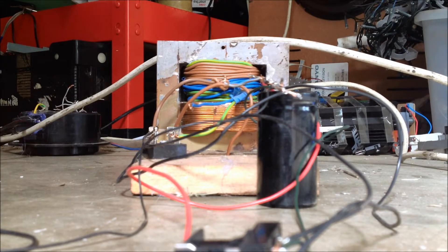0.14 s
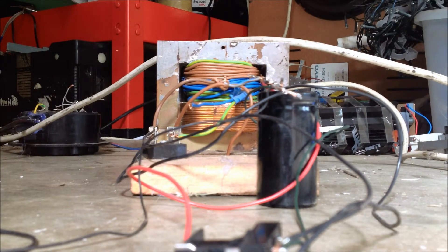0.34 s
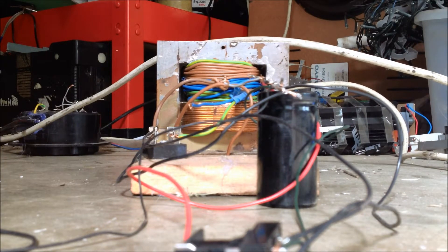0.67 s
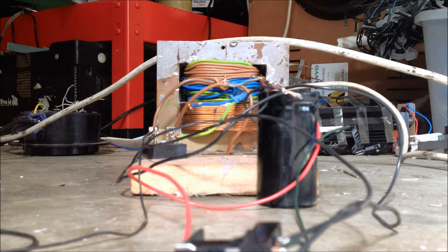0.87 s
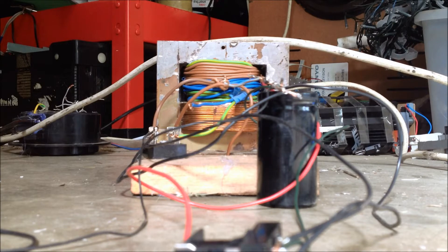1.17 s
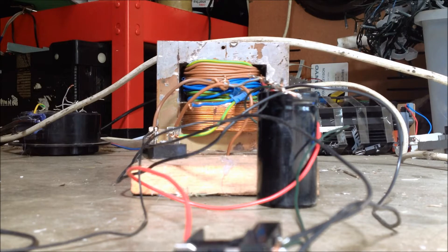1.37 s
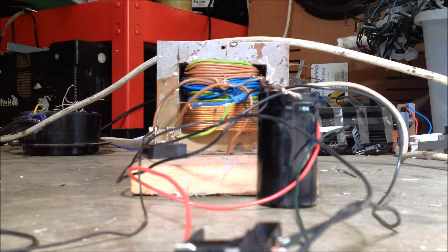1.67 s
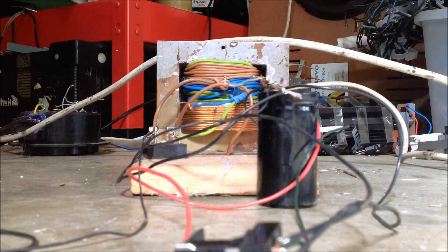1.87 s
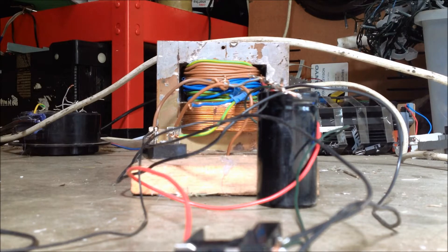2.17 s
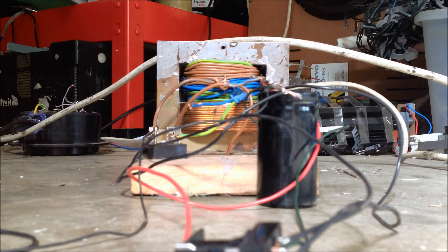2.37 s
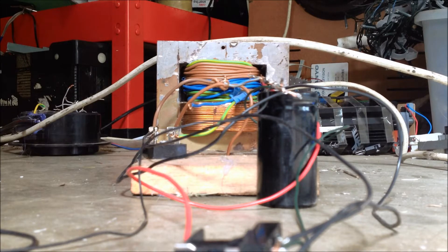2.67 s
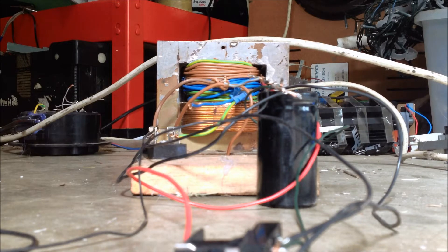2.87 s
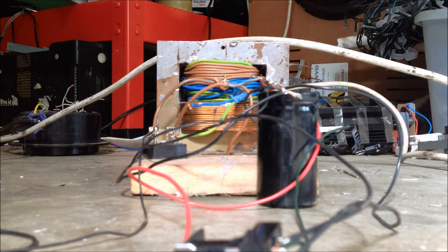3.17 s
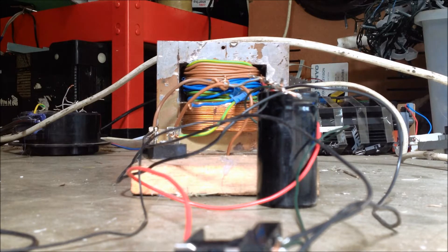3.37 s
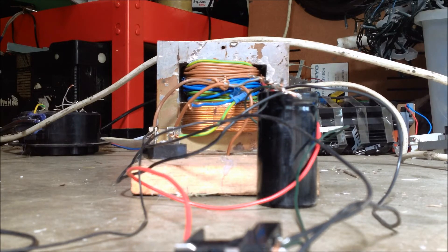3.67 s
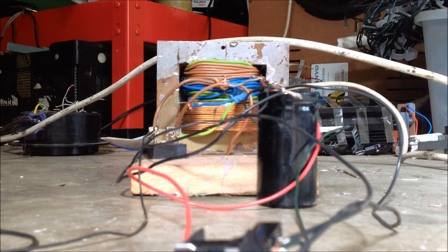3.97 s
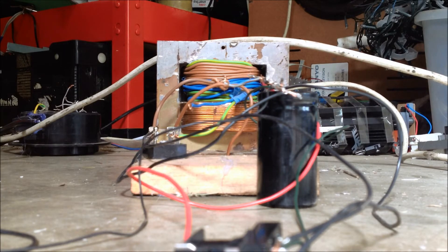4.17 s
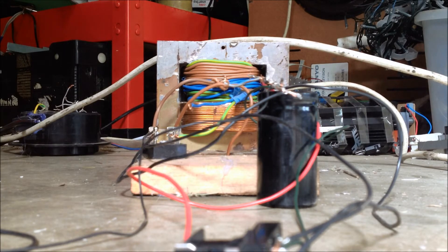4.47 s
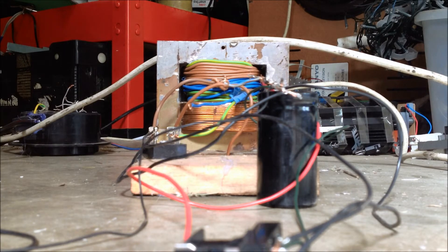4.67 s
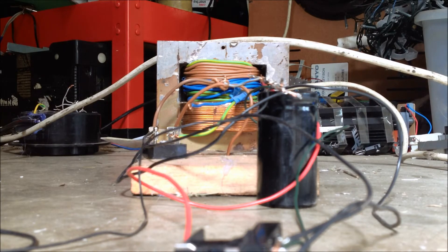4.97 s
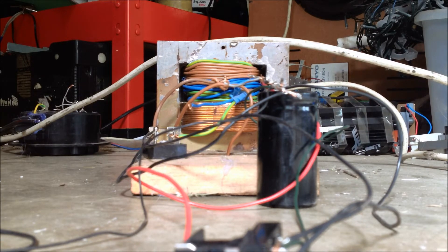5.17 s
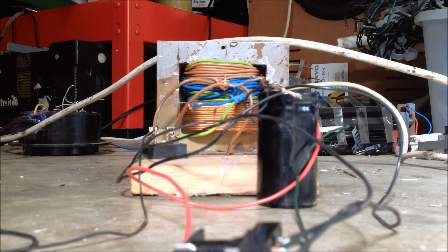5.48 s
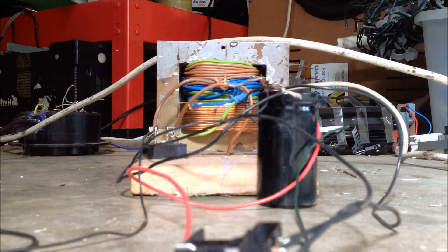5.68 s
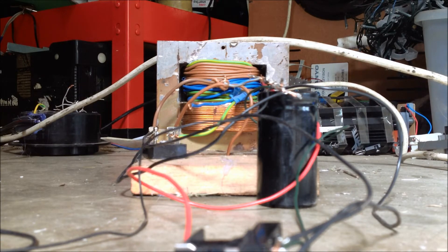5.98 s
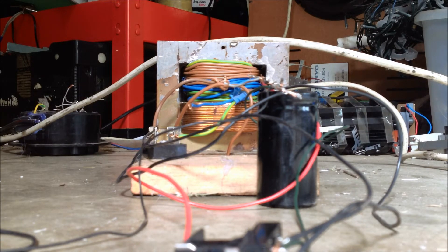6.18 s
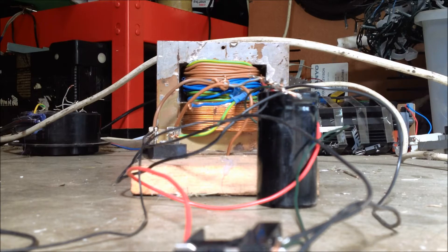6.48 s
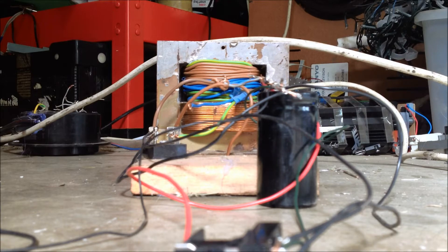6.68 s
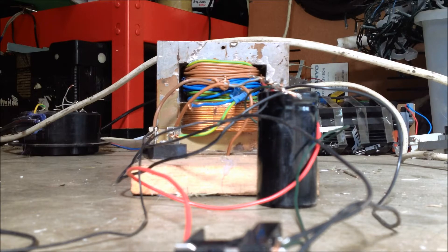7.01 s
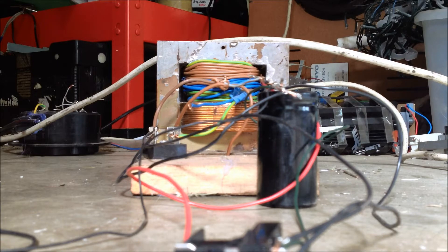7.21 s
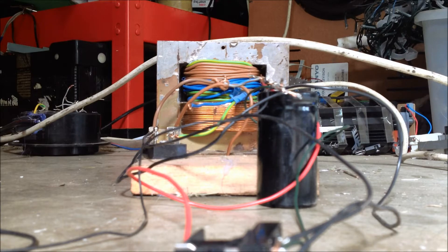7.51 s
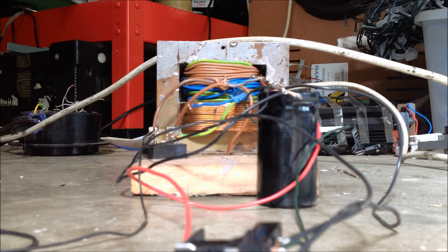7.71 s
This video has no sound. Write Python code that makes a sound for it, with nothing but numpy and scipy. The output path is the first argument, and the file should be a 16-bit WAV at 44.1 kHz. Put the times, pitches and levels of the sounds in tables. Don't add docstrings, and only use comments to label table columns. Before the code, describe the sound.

Six short bursts of loud, sharp electric sparks snap in a hard workshop, faint switch ticks before each, over quiet hum and hiss.

```python
import sys
import numpy as np
from scipy import signal
from scipy.fft import rfft, irfft
from scipy.io import wavfile
from scipy.ndimage import uniform_filter1d

SR = 44100
rng = np.random.default_rng(int(sys.argv[2]) if len(sys.argv) > 2 else 0)


def file_out(sig):
    cols = np.atleast_2d(sig).T
    lim = np.clip(cols, -1, 1)
    pcm = np.round(lim * 32767).astype(np.int16)
    wavfile.write(sys.argv[1], SR, pcm)


def rack_gain(trim_db):
    fader = np.asarray(trim_db, float)
    return 10 ** (fader / 20)


N = 346185

ARC_DULLING, ARC_SPREAD_DB = (0.042, 0.33, 0.93, 0), 3


def rms_one(x):
    return x / np.sqrt(np.mean(x ** 2) + 1e-20)


def band(x, low_hz, high_hz, order=2):
    high_hz = min(high_hz, 0.45 * SR)
    sos = signal.butter(order, [low_hz, high_hz], "band", fs=SR, output="sos")
    return signal.sosfilt(sos, x + 1e-18) * np.sqrt(SR / 2 / (high_hz - low_hz))


def coloured_rows(s, db, shift_db, extra_db, fade_ms, colour, follows, spread_db):
    chance_db = spread_db * rng.standard_normal((len(s), 4))
    levels_db = np.add.outer(db, colour) + np.outer(shift_db, follows) + chance_db
    levels_db[:, 3] += extra_db
    return np.column_stack([s, levels_db, fade_ms])


def discharges(rows, voices, rise_ms, after_db, after_ms, crackle_db, click_db):
    thump_hz = (130, 1107.5)
    lead = round(0.002 * SR)
    t_ms = (np.arange(round(0.05 * SR)) - lead) / SR * 1000
    rings, push = np.zeros((2, N + len(t_ms)))
    table = np.array(rows)
    shape = (len(rows), 3, len(t_ms))

    crackle = rng.standard_normal(shape)
    lumps = uniform_filter1d(rng.standard_normal(shape), size=16) * 4
    fading = rack_gain(-60 * t_ms / table[:, 5:])
    fading = fading + rack_gain(after_db - 60 * t_ms / after_ms)
    envelope = np.where(t_ms < 0, rack_gain(60 * t_ms / rise_ms), fading)
    puffs = crackle * rack_gain(crackle_db * lumps) * envelope[:, None]
    puffs[:, :, lead] += rack_gain(click_db)

    voiced = np.stack([band(puffs[:, k], hz - width_hz / 2, hz + width_hz / 2)
                       for k, (hz, width_hz) in enumerate(voices)], axis=1)
    power = uniform_filter1d(voiced ** 2, size=24)
    crest = np.sqrt(2 * power.max(axis=2, keepdims=True))
    sounds = (rack_gain(table[:, 1:4, None]) * voiced / crest).sum(axis=1)

    for s, thump_db, sound in zip(table[:, 0], table[:, 4], sounds):
        at = round((s + 0.0002) * SR) - lead
        rings[at:at + len(t_ms)] += sound
        push[at + lead] += rack_gain(thump_db)
        push[at + lead + 24] -= 2.2 * rack_gain(thump_db)
    boom = rack_gain(1.0) * band(push, 140, 260, order=1)
    return (rings + rack_gain(6.0) * (band(push, *thump_hz) + boom))[:N]


def sparks():
    # [t/s, strength/dB, dullness/dB, push/dB, restrike/dB]
    arcs = [(1.3666, -5, -1, 3.5, -3.5), (1.3857, -7, -4.5, -4, 0), (2.0868, -5.5, 4.5, 0, -1.5),
            (2.1053, -2.5, -4, -11.5, -5), (2.6722, -9.5, -5, -21, -3), (2.6853, -2, -4, -8.5, 1),
            (3.2662, -3, -3, -2.5, 2), (3.2858, -5, -3.5, -8, -2.5), (3.3239, -7.5, -5.5, -9.5, -6),
            (5.466, -4, -2, 4.5, 0), (5.4856, -7.5, 2, -3, -5.5), (5.5034, -13, 0.5, -4, -5),
            (6.488, -5.5, 2.5, -7, 5), (6.5056, -5, -6, 4, -2), (6.5239, -4.5, -1.5, -3.5, -7)]
    # [offset/ms, level re arc/dB]
    arc_train = [
        (-1.5, -29.5),
        (-2.7, -22),
        (1.23, -8.5),
        (3, -21),
        (7.5, -25.5),
    ]
    # [t/s, strength/dB, dullness/dB, push/dB, fade T60/ms]
    flashes = [(1.3796, -25.5, 18, 17.5, 5.1), (1.3808, -13.5, -6.5, -6.5, 5), (1.3829, -17.5, 9, -8.5, 5),
               (2.1006, -10, 13.5, 5.5, 2.5), (2.6757, -18.5, 19.5, 13.5, 6),
               (2.6782, -18.5, -0.5, 9.5, 6.6), (2.6889, -16, -0.5, 8, 5), (3.2463, -25.5, 35.5, 11.5, 8),
               (3.2495, -41.5, 40, 7, 11), (3.2524, -29, 24.5, 7, 6), (3.2537, -21, 15.5, -13.5, 23),
               (3.258, -27.5, 14, 0, 5), (3.2806, -17.5, 1, -14.5, 6.83), (5.4801, -12, -10.5, -16.5, 5),
               (5.4829, -19.5, -2, -2, 4.8), (6.4923, -21, 4, -9.5, 8), (6.4961, -28, 15.5, 3.5, 9.2),
               (6.502, -24, -0.5, -12, 7)]
    # [f/Hz, width/Hz]
    arc_voices = [
        (13740, 4700),
        (7460, 1700),
        (3240, 2800),
    ]
    arc_fade_ms, restrike_fade_ms, restrike_push_db = 4.5, 5, -12.5
    colour_db = (0.5, -9, -22, -27.5)

    rows = [*flashes]
    rows += [(*row[:4], arc_fade_ms) for row in arcs]
    for s, db, dull_db, push_db, again_db in arcs:
        for ms, under_db in arc_train:
            strength_db = db + under_db + again_db * (ms > 0)
            rows.append((s + ms / 1000, strength_db, dull_db, push_db + restrike_push_db, restrike_fade_ms))
    table = coloured_rows(*np.transpose(rows), colour_db, ARC_DULLING, ARC_SPREAD_DB)
    return discharges(table, arc_voices, rise_ms=2.5, after_db=-15.0, after_ms=22,
                      crackle_db=2.5, click_db=(9, 8, 11))


def breaks():
    # [t/s, strength/dB, loss per strike/dB, length/ms]
    releases = [
        (1.5642, -13, 6.5, 5),
        (2.2002, -16.5, 3, 5),
        (2.7684, -12.5, 6, 5),
        (3.3428, -15.5, 2, 5),
        (5.6226, -17, 2.2, 10),
        (6.6837, -13.5, 4.5, 11),
    ]
    # [f/Hz, width/Hz]
    break_voices = [
        (13200, 4400),
        (7600, 2000),
        (3850, 3140),
    ]
    strike_gap_ms, leader_db, fade_ms = 1.85, -10.5, 4.5
    colour_db = (-1.5, -7.5, -20.5, -46)

    strikes = []
    for s, db, loss_db, length_ms in releases:
        for k in np.arange(-1, length_ms / strike_gap_ms):
            change_db = leader_db if k < 0 else -loss_db * k
            strikes.append((s + k * strike_gap_ms / 1000, db + change_db))
    s, db = np.transpose(strikes)
    table = coloured_rows(s, db, 0 * s, 0, fade_ms + 0 * s, colour_db, ARC_DULLING, ARC_SPREAD_DB)
    return discharges(table, break_voices, rise_ms=2.5, after_db=-13.0, after_ms=24,
                      crackle_db=5.5, click_db=(9, 7, 9))


def ticks():
    # [t/s, strength/dB, brightness/dB]
    contacts = [(0.1667, -36, -35), (0.5185, -53, -1), (0.6027, -51.5, -15), (1.1693, -54.5, -10),
                (1.3049, -50, 8.5), (1.3263, -56, -0.5), (1.3474, -44.5, 3.5), (1.996, -55.5, 3),
                (2.0215, -54, 0.5), (2.6033, -50, 3.5), (2.6278, -56.5, 10), (2.6423, -59.5, 6.5),
                (3.162, -50.5, 5.5), (3.189, -54, 3.5), (3.4987, -72, 8), (3.5133, -58, -10),
                (5.0215, -55.5, -8), (5.053, -53.5, -2), (5.4372, -49, -2.5), (6.004, -56.5, -3),
                (6.0256, -60, 7.5), (6.8181, -64.5, -12), (6.849, -57, 3.5), (6.8632, -70.5, 16),
                (6.9648, -56.5, -7), (6.9865, -60, 8), (7.408, -62, 5), (7.6783, -39.5, -21.5),
                (7.7038, -40.5, -18)]
    # [t/s, strength/dB, brightness/dB, thud/dB, fade T60/ms]
    twitches = [
        (1.3499, -49.5, 14.5, -7, 19),
        (1.356, -51, 2, 7, 15),
        (2.076, -45.5, 5, -7, 22),
        (2.079, -35, -1, -12, 15),
        (4.8747, -43.5, 4.5, -13, 23),
        (5.455, -50.5, 10.5, 4, 20),
        (6.4828, -41, -14, -8, 11),
        (7.055, -81, 12, 25.5, 22),
        (7.15, -84, 24.5, 11, 13),
    ]
    # [f/Hz, width/Hz]
    tick_voices = [(12800, 8900), (5000, 6400), (2070, 1900)]
    # [t/s, fizz/dB, snap/dB, knock/dB, thump/dB]
    let_go = [
        (7.5883, -34.5, -32.5, -58, -52),
        (7.5947, -54, -40.5, -44.5, -47),
        (7.6042, -46, -49, -52.5, -48.5),
    ]
    # [f/Hz, width/Hz]
    let_go_voices = [(11500, 12000), (5580, 2800), (900, 940)]
    tick_fade_ms, let_go_fade_ms, spread_db = 8.0, 14, 2
    colour_db, brightening = (-14, -7.5, -2, -14), (1.25, 1.4, 0.042, 0.1)

    rows = [(*row, 0, tick_fade_ms) for row in contacts] + [*twitches]
    table = coloured_rows(*np.transpose(rows), colour_db, brightening, spread_db)
    hand = [(*row, let_go_fade_ms) for row in let_go]
    build = dict(rise_ms=1.2, after_db=-12.5, after_ms=40, crackle_db=2.0, click_db=(8, 9, 13))
    return discharges(table, tick_voices, **build) + discharges(hand, let_go_voices, **build)


def workshop(x):
    # [f/Hz, T60/s, level/dB]
    room = [(500, 0.23, -25.5), (1306, .22, -18.5), (3275, 0.27, -16.5), (5000, 0.22, -11.5),
            (6530, 0.2, -21), (7800, 0.25, -20.5), (8500, 0.17, -21), (12600, 0.18, -20.5),
            (15500, .2, -24.5)]
    hz, t60_s, level_db = np.transpose(room)
    edges_hz = 500 * 2 ** np.arange(0, 5.1, 1 / 5)
    white, out = rng.standard_normal((2, N)), 0
    swell = np.exp(-1 / (0.002 * SR))
    for k, (low, high) in enumerate(zip(edges_hz, edges_hz[1:])):
        centre = np.log(low * high) / 2
        hold = rack_gain(-120 / (np.interp(centre, np.log(hz), t60_s) * SR))
        given = band(x, low, high) ** 2 * (high - low) * 2 / SR
        stored = signal.lfilter([1], [1, -hold], given)
        stored = signal.lfilter([1 - swell], [1, -swell], stored)
        gain = rack_gain(np.interp(centre, np.log(hz), level_db) - 27.5)
        out = out + gain * np.sqrt(stored) * band(white[k % 2], low, high)
    return out


def lingering(x, db, t60_s, grain_db, edges_hz, order):
    stored = signal.lfilter([1], [1, -rack_gain(-120 / (t60_s * SR))], x ** 2)
    grain = rack_gain(grain_db * rms_one(band(rng.standard_normal(N), 40, 400, order=1)))
    return rack_gain(db) * np.sqrt(stored) * grain * band(rng.standard_normal(N), *edges_hz, order=order)


def rustle():
    grab_s, attack_s, grab_t60_s, drag_loss_db_per_s = 7.585, 0.015, 0.19, 24
    t = np.arange(N) / SR - grab_s
    start = np.clip(t / attack_s, 0, 1)
    t = np.maximum(t, 0)

    def gain(grab_db, drag_db):
        return start * (rack_gain(grab_db - 60 * t / grab_t60_s) + rack_gain(drag_db - drag_loss_db_per_s * t))

    grain = rack_gain(2.5 * rms_one(band(rng.standard_normal((2, N)), 9, 60, order=1)))
    cloth = gain(-68.5, -64) * band(rng.standard_normal(N), 1500, 7200, order=1)
    brush = gain(-58, -62) * band(rng.standard_normal(N), 182, 1500, order=1)
    return grain[0] * cloth + grain[1] * brush


def bird():
    # [t/s, length/s, f/Hz, width/Hz, level/dB]
    whistles = [(0.77, 0.12, 3750, 900, -73), (0.85, 0.12, 3300, 1100, -74), (1.72, 0.11, 4700, 60, -90),
                (2.05, 0.1, 3600, 80, -87), (2.6, 0.05, 3600, 160, -86), (3.53, 0.3, 3620, 80, -82.5),
                (4.37, 0.18, 4030, 70, -77.5), (4.689, 0.05, 4940, 300, -67), (4.695, 0.04, 6200, 250, -79),
                (4.723, 0.13, 4900, 200, -77), (5.522, 0.13, 4550, 140, -87), (5.55, 0.13, 3300, 200, -82),
                (5.99, 0.07, 4950, 300, -83), (7.344, 0.06, 4980, 400, -79), (7.705, 0.06, 6300, 500, -73),
                (7.71, 0.059, 5320, 480, -67)]
    out = np.zeros(N)
    blur = rng.standard_normal((len(whistles), SR // 2))
    for (s, length_s, hz, width_hz, db), noise in zip(whistles, blur):
        n, at = min(round(length_s * SR), SR // 2), round(s * SR)
        slow = signal.butter(2, width_hz / 2, fs=SR, output="sos")
        wobble = rms_one(signal.sosfilt(slow, noise))[-n:]
        swell = np.hanning(n) ** 0.3 * (0.5 + wobble)
        phase = 2 * np.pi * hz * np.arange(n) / SR
        out[at:at + n] += rack_gain(db) * swell * np.sin(phase)
    return out


def ducking(x):
    from_db, share, most_db, at_start_db = -51, 0.27, 10.5, 2.5
    attack_s, recover_db_per_s = 0.06, 6.0
    level_db = 10 * np.log10(np.abs(uniform_filter1d(x ** 2, size=2048)) + 1e-12)
    wanted_db = np.clip(share * (level_db - from_db), 0, most_db)
    wanted_db[0] = at_start_db
    ramp_db = recover_db_per_s * np.arange(N) / SR
    held_db = np.maximum.accumulate(wanted_db + ramp_db) - ramp_db
    r = np.exp(-1 / (attack_s * SR))
    return rack_gain(-signal.lfilter([1 - r], [1, -r], held_db, zi=[r * held_db[0]])[0])


def coloured(spectrum):
    hz, db = np.transpose(spectrum)
    grid = np.log(np.arange(N // 2 + 1) * SR / N + 1)
    shape = rack_gain(np.interp(grid, np.log(hz), db))
    return rms_one(irfft(rfft(rng.standard_normal(N)) * shape, N))


def background():
    # [f/Hz, density/dB per Hz]
    air = [(24, -56), (40, -29), (119, -16), (200, -1), (336, -11), (413, -5.5), (637, -13), (1150, -13),
           (1800, -27), (2500, -30), (3250, -57.5), (5500, -120)]
    # [f/Hz, density/dB per Hz]
    hiss = [(900, -26.5), (1500, -8), (2400, -11.5), (4500, -12.5), (8000, -15.5), (9000, -18.5),
            (10500, -19.5), (12000, -16.5), (14000, -13.5), (15000, -17.5), (16000, -9.5)]
    # [f/Hz, width/Hz, level re rumble/dB]
    hum_bands = [(208.3, 40, -23), (395.1, 22, -11)]
    # [f/Hz, level re rumble/dB]
    lines = [(199.5, -2.5), (937, -22.5), (1169, -18), (1405, -13.5), (1640, -14)]
    rumble_db, hiss_db = -66, -67

    rumble = coloured(air)
    for hz, width_hz, db in hum_bands:
        blurred = band(rng.standard_normal(N), hz - width_hz / 2, hz + width_hz / 2, order=1)
        rumble += rack_gain(db) * rms_one(blurred)
    for hz, db in lines:
        rumble += rack_gain(db) * np.sin(2 * np.pi * hz * np.arange(N) / SR)
    gusts = rack_gain(5 * rms_one(band(rng.standard_normal(N), 4.0, 6, order=1)))
    rumble += rack_gain(-14.5) * gusts * rms_one(band(rng.standard_normal(N), 25, 98, order=1))
    return rack_gain(rumble_db) * rumble + rack_gain(hiss_db) * coloured(hiss)


def scene():
    arcs, releases = sparks(), breaks()
    hits = arcs + releases + ticks()
    tails = lingering(arcs, db=-69, t60_s=0.34, grain_db=1.5, edges_hz=(900, 7100), order=1)
    tails += lingering(arcs, db=-67.5, t60_s=0.34, grain_db=1.5, edges_hz=(9500, 15000), order=1)
    tails += lingering(releases, db=-65, t60_s=0.3, grain_db=1.7, edges_hz=(7300, 8100), order=2)
    quiet = ducking(hits) * background()
    return (hits + workshop(hits) + tails + quiet + bird() + rustle())[None]


def top_cut(x):
    return signal.sosfilt(signal.butter(12, 16520, fs=SR, output="sos"), x)


def record(dry):
    cutoff_hz = 15400
    x = 1.05 * np.tanh(dry / 1.05)
    x = signal.sosfilt(signal.butter(2, 105, "high", fs=SR, output="sos"), x)
    low = signal.sosfiltfilt(signal.cheby2(20, 40, cutoff_hz, fs=SR, output="sos"), x)
    loud = np.clip(uniform_filter1d(np.abs(x), size=256) / rack_gain(-35.5) - 1, 0, 1)
    top = signal.butter(10, [cutoff_hz, 16500], "band", fs=SR, output="sos")
    mix = low + rack_gain(-24) * signal.sosfiltfilt(top, loud * x)
    return top_cut(mix)


dry = scene()
out = record(dry)
file_out(out)
```